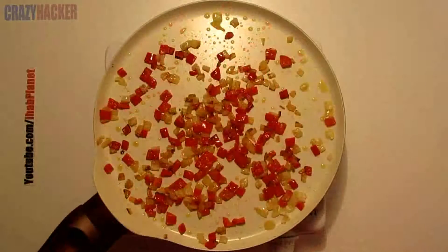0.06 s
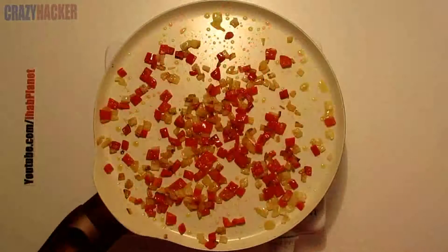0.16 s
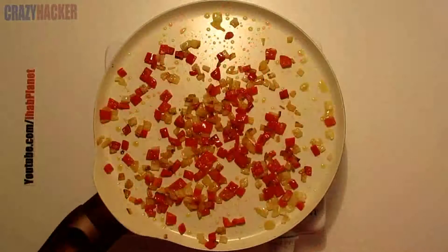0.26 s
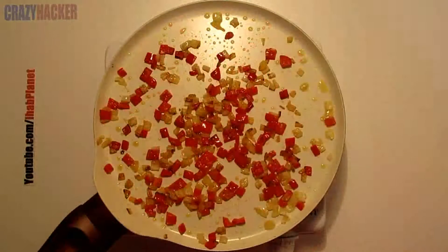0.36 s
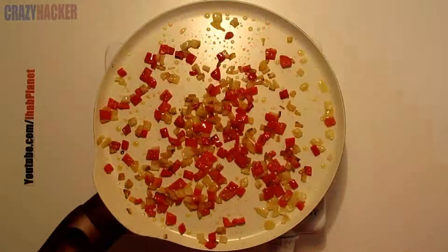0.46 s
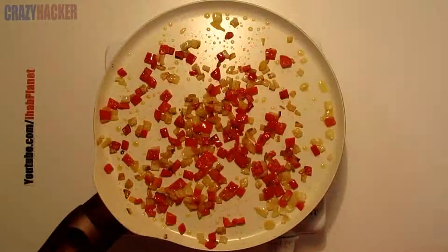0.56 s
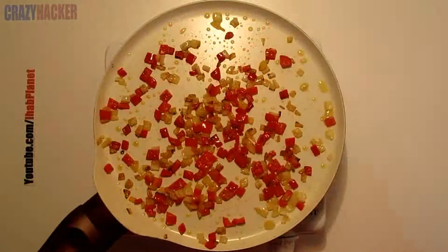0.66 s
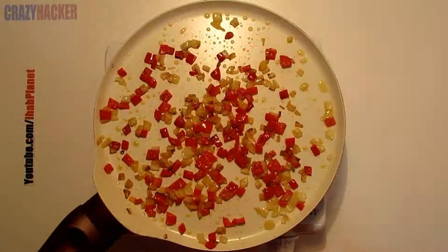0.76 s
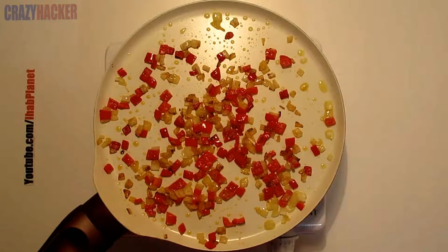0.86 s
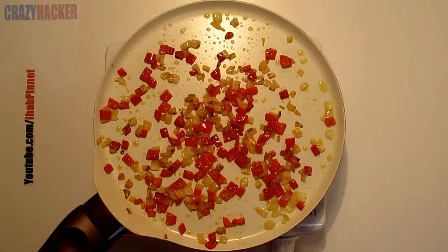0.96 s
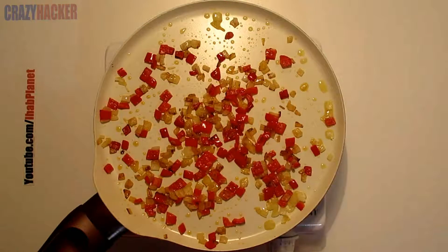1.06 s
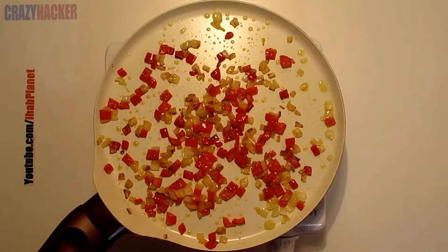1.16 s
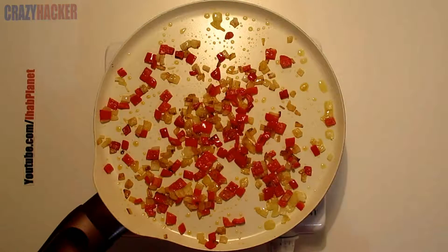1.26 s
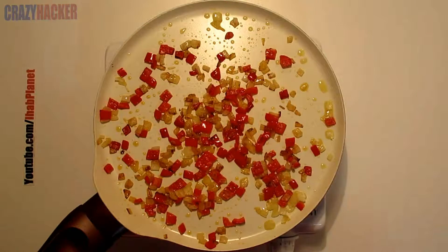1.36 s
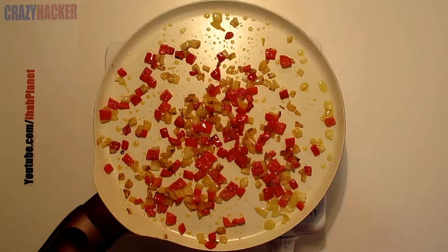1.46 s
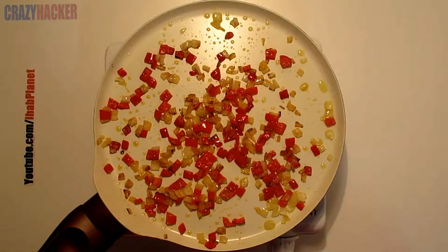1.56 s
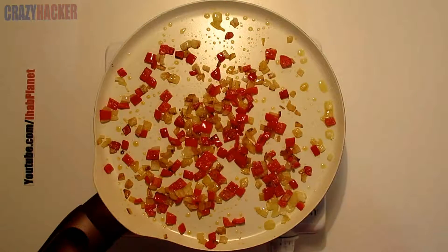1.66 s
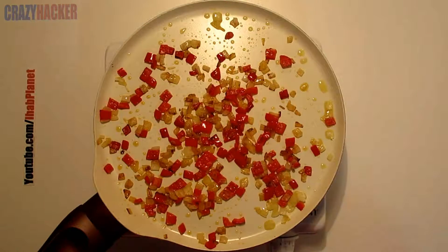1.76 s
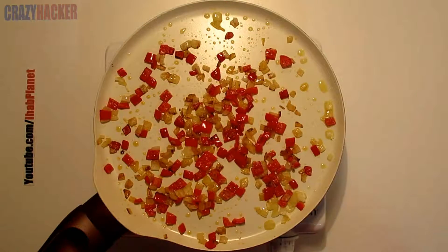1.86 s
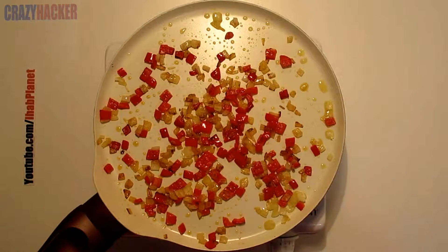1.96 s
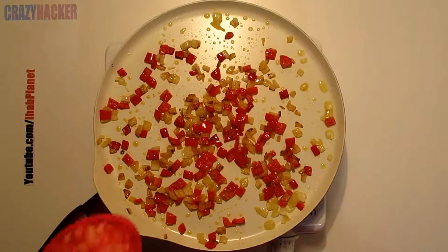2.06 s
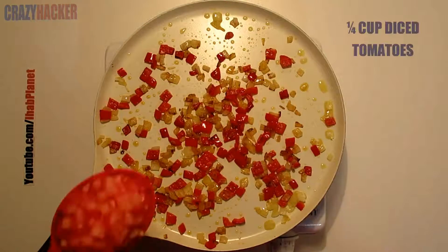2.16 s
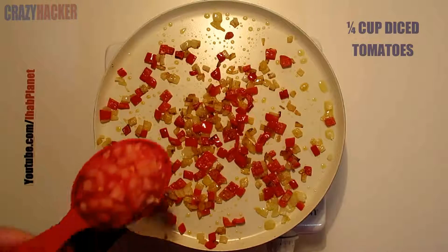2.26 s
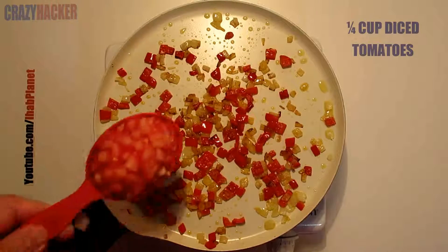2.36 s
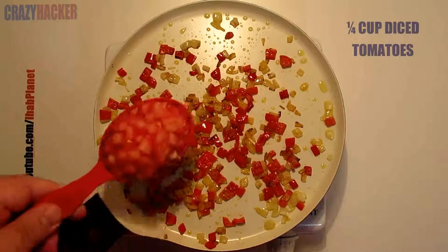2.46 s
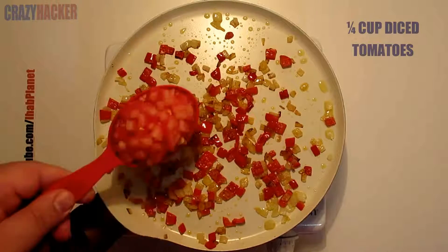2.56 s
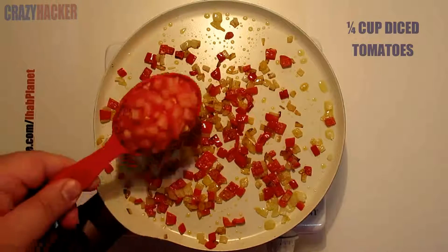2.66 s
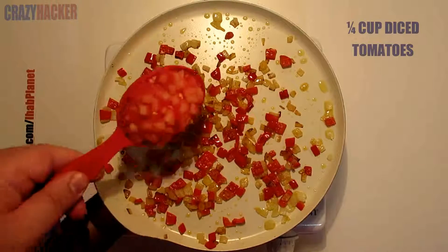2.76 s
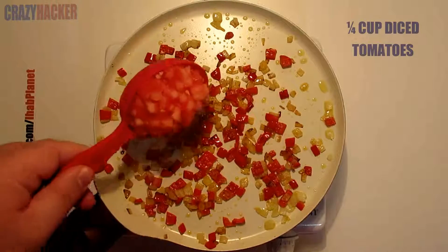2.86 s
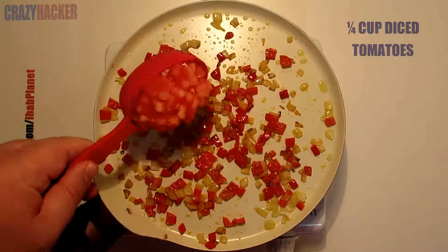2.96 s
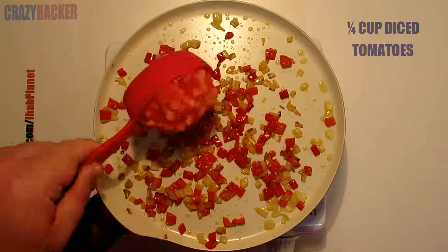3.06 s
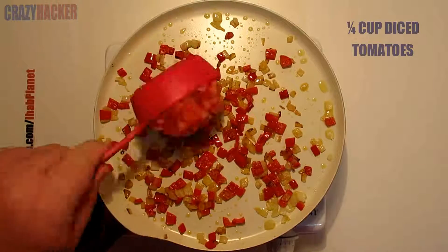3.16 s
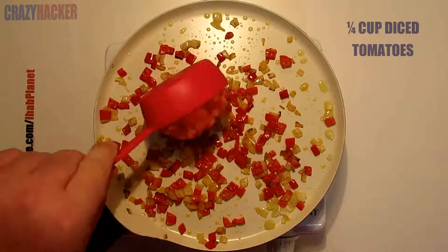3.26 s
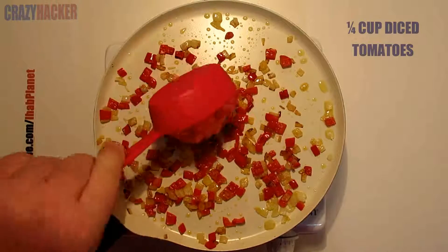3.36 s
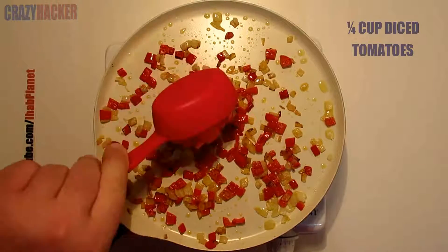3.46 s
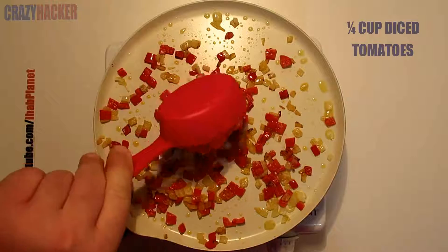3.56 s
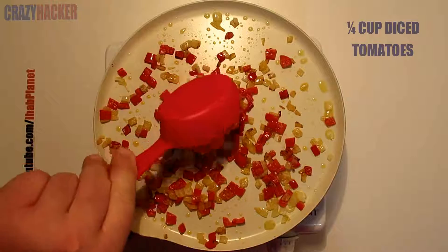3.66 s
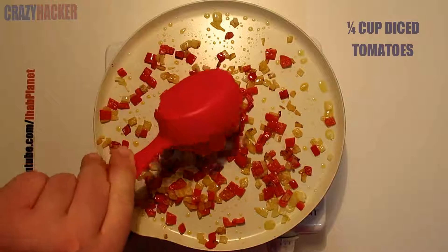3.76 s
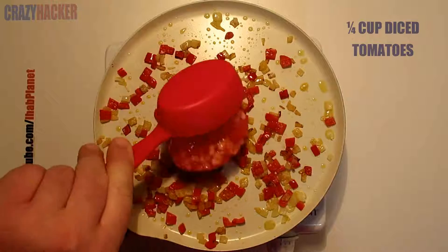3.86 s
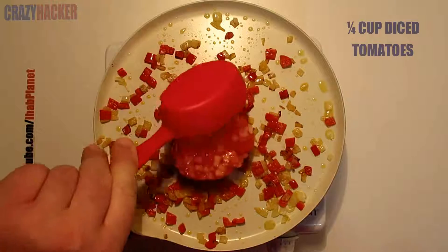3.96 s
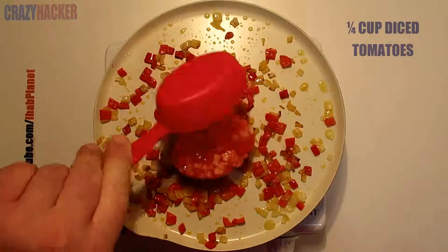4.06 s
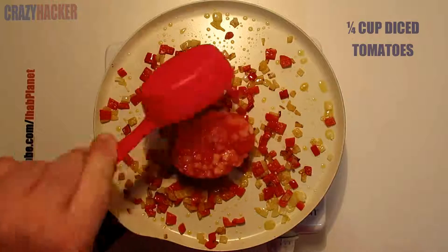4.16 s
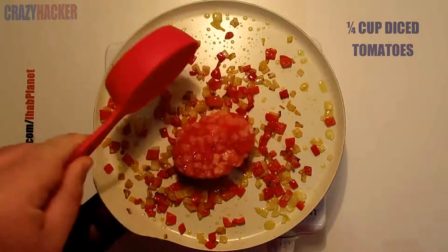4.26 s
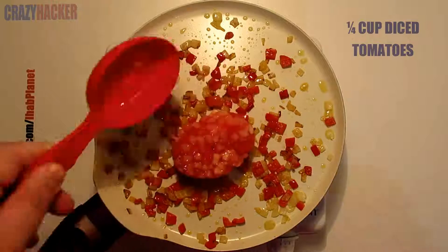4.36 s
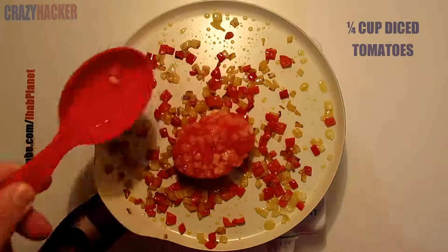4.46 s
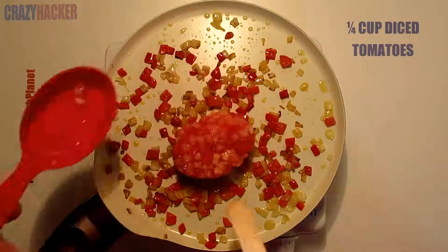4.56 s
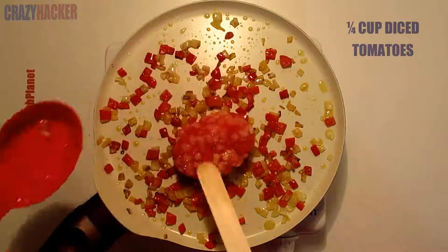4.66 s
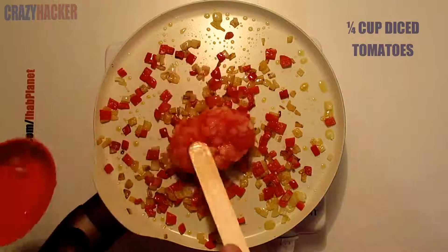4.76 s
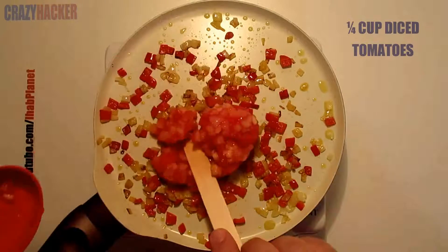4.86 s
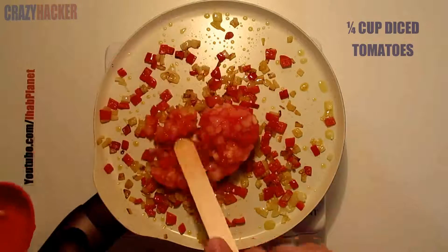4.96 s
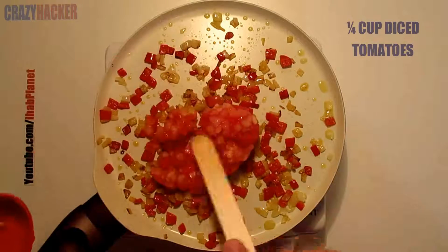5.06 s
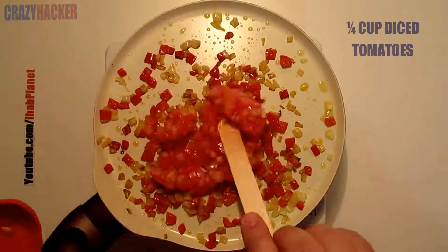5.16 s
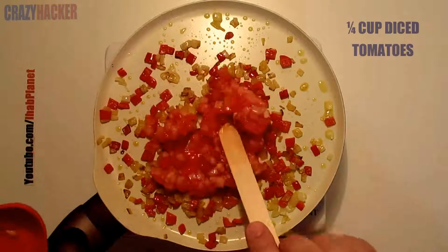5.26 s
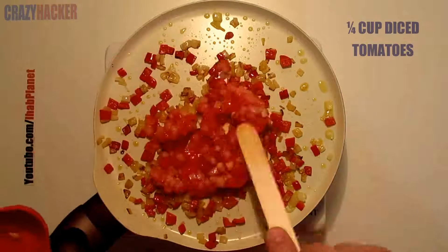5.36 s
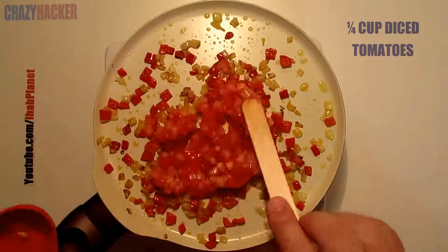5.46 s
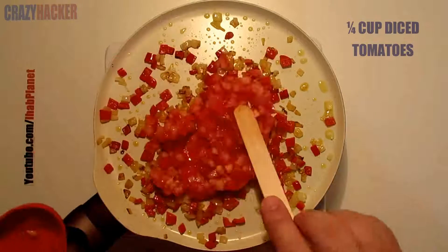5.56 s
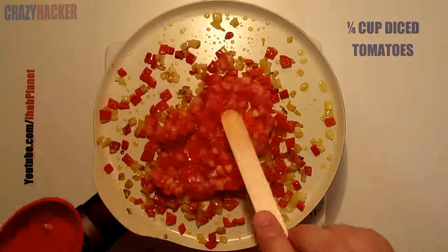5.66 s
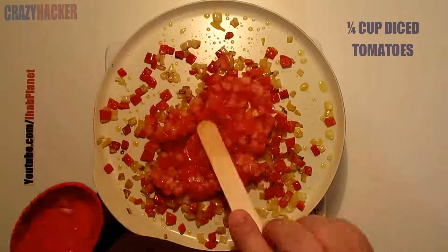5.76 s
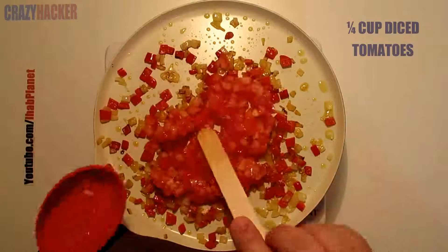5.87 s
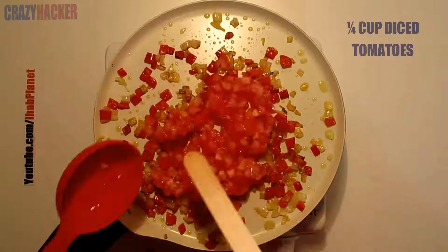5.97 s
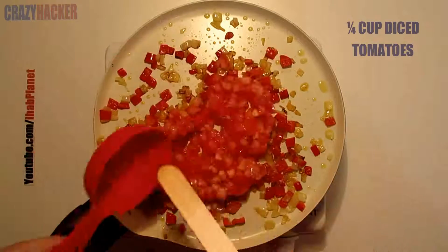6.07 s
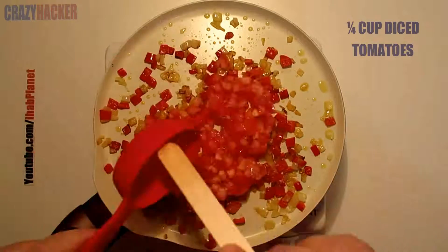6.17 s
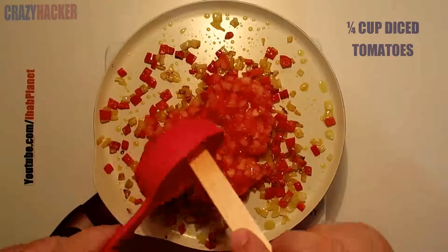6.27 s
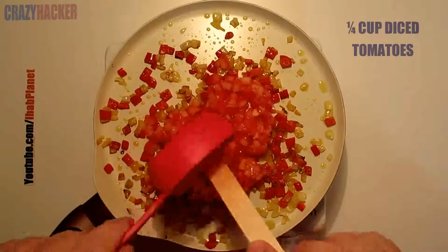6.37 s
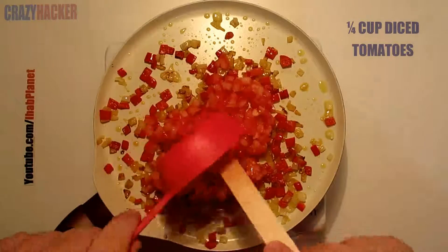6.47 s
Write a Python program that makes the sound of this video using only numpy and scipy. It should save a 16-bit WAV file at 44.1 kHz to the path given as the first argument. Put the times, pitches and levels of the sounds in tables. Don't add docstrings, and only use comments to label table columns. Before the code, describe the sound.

A nearly dry pan fizzes faintly with stray spits and soft knocks, then wet tomato lands and swells into a dense crackling sizzle.

```python
import sys
import numpy as np
from scipy import signal
from scipy.fft import rfft, irfft
from scipy.io import wavfile

SR = 44100
rng = np.random.default_rng(int(sys.argv[2]) if len(sys.argv) > 2 else 0)


def boost_factor(decibels):
    exponent = np.asarray(decibels, float) / 20
    return 10 ** exponent


def file_out(sig):
    cols = np.atleast_2d(sig).T
    lim = np.clip(cols, -1, 1)
    pcm = np.round(lim * 32767).astype(np.int16)
    wavfile.write(sys.argv[1], SR, pcm)


N = 287526

# time_s, level_db
FRYING_VIGOUR = [(4.15, -76), (4.24, -66), (4.31, -57.5), (4.42, -58), (4.5, -62.5), (4.76, -58.5),
                 (4.9, -60.5), (4.97, -56.5), (5.03, -57), (5.12, -53), (5.36, -51.5), (5.52, -49),
                 (5.7, -48.5), (6.05, -48.5), (6.25, -48), (6.52, -48)]
FULL_BOIL_DB = -48
# full_boil_db, steepness (dB per dB of vigour)
BUBBLE_SIZES = [
    (-47.5, 0.87),
    (-49.5, 1.72),
    (-50, 1.86),
]
# freq_hz, level_db
SIZZLE_COLOUR = [(400, -17), (800, -7), (1350, -9.5), (1600, -14), (1850, -4.5), (2400, -0.5), (3300, -1),
                 (3600, -2.5), (5500, 4.5), (9000, 2.5), (13000, 2.5), (15500, -4)]
# freq_hz, width_hz, level_db
PAN_MODES = [(1385, 82, 0), (1850, 57, 2), (2000, 30, -14), (2120, 70, -2), (2260, 47, -9), (2450, 31, -13),
             (2860, 110, -26), (3210, 65, 2), (4170, 41, 0), (4800, 82, -7), (5500, 68, -29)]
# delay_s, level_db
ECHOES = [
    (.0021, -54),
    (.0032, -21),
    (.0095, -15.5),
]
COUNTER_ECHO_S, COUNTER_ECHO_DB = .00105, -4
BUBBLE_DAMPING = 1.3
# time_s, peak_db, pitch_hz
SPITS = [(0.4194, -51, 7500), (0.8023, -46, 5500), (0.9232, -47, 7800), (1.1549, -45, 9000),
         (1.1901, -42, 11000), (1.3573, -48, 8000), (2.1741, -44, 9000), (2.7617, -45, 5900),
         (2.8711, -43, 6300), (3.2709, -53, 7800), (3.5512, -45, 11000), (3.6846, -42, 5500),
         (3.7947, -43, 7000), (3.8033, -46, 10500), (3.8916, -42, 5500), (4.0417, -39, 5200)]
# time_s, peak_db, pitch_hz
HEAP_POPS = [(4.2715, -46, 2800), (4.3043, -45, 2100), (4.3585, -41, 2300), (4.3683, -41, 3900),
             (4.3844, -44, 2400), (4.41, -39, 6300), (4.4146, -41, 5200), (4.4254, -40, 2400),
             (4.4536, -38, 2100), (4.5959, -42, 2400), (4.6111, -38, 8400), (4.6825, -44, 3000),
             (4.6983, -43, 2600), (4.7792, -25, 6300), (4.7832, -41, 3900), (4.7931, -40, 3200),
             (4.8512, -41, 3000), (4.8607, -42, 2800), (4.8871, -42, 5200), (4.8971, -40, 2600),
             (4.9454, -39, 2600), (4.9603, -38, 2800), (4.972, -36, 5900), (4.9903, -39, 2800),
             (5.0106, -36, 5200)]
# time_s, peak_db, pitch_hz
LOUD_POPS = [(5.0429, -30, 6300), (5.05, -21, 5500), (5.0542, -34, 4200), (5.0895, -31, 5500),
             (5.1158, -29, 5200), (5.1247, -32, 6300), (5.1588, -26, 2800), (5.165, -26, 6800),
             (5.191, -33, 5500), (5.2168, -32, 6800), (5.2224, -29, 2600), (5.2545, -34, 3900),
             (5.2619, -24, 5500), (5.3121, -27, 5200), (5.3152, -30, 2300), (5.3283, -31, 7800),
             (5.3659, -28, 4200), (5.3928, -34, 2800), (5.4546, -32, 3000), (5.4932, -28, 4500),
             (5.5037, -24, 6300), (5.5552, -29, 7800), (5.5624, -27, 6800), (5.5759, -28, 2800),
             (5.5958, -31, 2600), (5.6098, -30, 9600), (5.6336, -29, 10300), (5.6459, -29, 2400),
             (5.7091, -23, 6300), (5.7258, -30, 5900), (5.745, -25, 2600), (5.7682, -28, 6300),
             (5.8119, -23, 9000), (5.8242, -26, 4800), (5.8495, -29, 6800), (5.8746, -23, 10300),
             (5.8947, -24, 6300), (5.9104, -29, 7800), (5.942, -25, 6800), (5.9691, -26, 10300),
             (6.0434, -26, 2600), (6.0669, -24, 2800), (6.1258, -27, 8400), (6.1342, -29, 2800),
             (6.1589, -28, 2400), (6.2186, -29, 5200), (6.2407, -26, 5500), (6.2669, -28, 7300),
             (6.2751, -28, 5200), (6.3003, -28, 9600), (6.3156, -27, 5900), (6.3229, -24, 6300),
             (6.347, -24, 2800), (6.3547, -27, 5500), (6.3954, -25, 4500), (6.4145, -22, 6300),
             (6.4557, -28, 10300), (6.4831, -28, 5200)]
# time_s, level_db
SIMMER_FIZZ = [
    (0.0, -63),
    (1.68, -62),
    (2.29, -62),
    (4.14, -59),
    (4.3, -63),
]
# start_s, peak_db, hardness_db (treble, relative), contact_s
KNOCKS = [(0.06, -54.5, -6, 0.021), (0.623, -42, 2, 0.041), (0.684, -57, 3, 0.025), (1.053, -59, 1, 0.03),
          (1.44, -55.5, -12, 0.036), (2.479, -50, -12, 0.021), (2.706, -40, 0.5, 0.026),
          (2.744, -48, -13, 0.015), (3.571, -51.5, -13, 0.029), (4.056, -35.5, -3.5, 0.022),
          (4.084, -47.5, -5, 0.037), (4.127, -44, -6.5, 0.046), (4.178, -53, -0.5, 0.013),
          (4.24, -45, -3.5, 0.037), (4.367, -44, -9, 0.026), (4.593, -41, -7, 0.028),
          (4.94, -50.5, 1.5, 0.018), (4.976, -40.5, -2.5, 0.021), (5.034, -45.5, -1.5, 0.055),
          (5.409, -39, -0.5, 0.021), (5.739, -38.5, 0, 0.022), (6.066, -60.5, 21, 0.011),
          (6.414, -48, 12, 0.015)]
# freq_hz, level_db, t60_s
HOB_MODES = [(515, -13, 0.14), (575, -7.5, .05), (595.4, 1.5, 0.12), (627, 0, 0.12), (785, -3.5, 0.045),
             (955, -4.5, 0.09), (1020, -5, 0.11), (1140, -10.5, 0.072)]
# freq_hz, level_db (per Hz)
CLACK_COLOUR = [(900, -11), (1700, -8.5), (2300, 1.5), (2600, -2.5), (3100, -9), (3800, -8.5), (4400, -5),
                (4900, -5), (5700, -14), (9200, -10.5), (10000, -17.5), (14000, -63)]
# level_db, pitch_hz, t60_s
THUMP = (-59, 52, 0.38)
THUMP_S = 4.05
# start_s, hold_s, level_db
BRUSHES = [
    (1.05, 0.032, -60.5),
    (1.12, 0.071, -71),
    (1.19, 0.0089, -67.5),
]
# freq_hz, level_db (per Hz)
BRUSH_COLOUR = [(400, -14), (620, 0.5), (1000, -7), (1450, -1), (2300, 2), (3200, -4), (5000, -6),
                (9000, -18), (14000, -29)]
# start_s, hold_s, level_db
WHISTLES = [
    (.72, 0.68, -74),
]
# freq_hz, width_hz, level_db
WHISTLE_BANDS = [
    (1456, 69, -4),
    (1624, 64, -6),
    (1710, 79, -2),
]
# freq_hz, level_db (per Hz)
AIR_COLOUR = [(20, -16), (55, -6), (106, -5.5), (140, -4.5), (170, -7.5), (360, -7.5), (700, -11),
              (1300, -11.5), (3000, -13), (3800, -18), (7500, -13.5), (9200, -19), (12700, -19.5),
              (14700, -26.5)]
AIR_DB = -63
# freq_hz, width_hz, level_db
DRONES = [
    (54.3, 17, -81),
    (141.4, 9.2, -75),
    (940, 29, -80.5),
]


def sizzle():
    vigour_db = in_time(FRYING_VIGOUR, silent_db=-120)[0] - FULL_BOIL_DB
    levels = [db + steepness * vigour_db for db, steepness in BUBBLE_SIZES]
    bursts = grains(6000, spread_db=3.4)
    dealt = rng.integers(0, 12, N)
    out = 0
    for k, hz in enumerate(np.geomspace(1300, 13000, 12)):
        size = np.interp(np.log(hz), np.log([2600, 5700, 11000]), [0, 1, 2])
        level_db = sum(max(1 - abs(size - j), 0) * level for j, level in enumerate(levels))
        one = rms_one(bubble(bursts * (dealt == k), hz))
        delay = int(COUNTER_ECHO_S * SR * rng.uniform(0.864, 2.5))
        one = one + boost_factor(COUNTER_ECHO_DB - 11) * np.roll(one, delay)
        flicker_db = 1.2 * drift(14)
        out = out + boost_factor(level_db + flicker_db - 7) * one
    return colour(in_pan(out, ring_db=1, tail_db=-30, tail_t60=.08), SIZZLE_COLOUR)


def pops():
    bursts = lesser_pops() + SPITS + HEAP_POPS + LOUD_POPS
    out = np.zeros(N + 256)
    spots = rng.standard_normal((len(bursts), 3))
    for (s, db, hz), spot in zip(bursts, spots):
        click = np.zeros(256)
        click[0] = 1
        click[int(COUNTER_ECHO_S * SR + 1.5 * spot[0])] = boost_factor(COUNTER_ECHO_DB + 1.5 * spot[1])
        edge_db = -12.5 + 4 * spot[2]
        crack = boost_factor(edge_db) * np.convolve(click, [.5, -1, .5])[:256]
        i = int(s * SR)
        out[i:i + 256] += boost_factor(db + 4.5) * (bubble(click, hz) + crack)
    return in_pan(band(out[:N], 800, 19500), ring_db=-3, tail_db=-27, tail_t60=.05)


def lesser_pops():
    per_s, over_boil_db, spread_db = 34, 15, 2.5
    low_hz, high_hz = 2800, 10000
    s, db = np.transpose(FRYING_VIGOUR)
    draw = rng.random((int(per_s * (s[-1] - s[0])), 3))
    when = s[0] + (np.arange(len(draw)) + draw[:, 0]) / per_s
    level_db = np.interp(when, s, db) + over_boil_db + spread_db * (2 * draw[:, 1] - 1)
    pitch_hz = low_hz * (high_hz / low_hz) ** draw[:, 2]
    return list(zip(when, level_db, pitch_hz))


def bubble(clicks, hz):
    r, w = np.exp(-BUBBLE_DAMPING * hz / SR), 2 * np.pi * hz / SR
    return signal.lfilter([0, 1], [1, -2 * r * np.cos(w), r * r], clicks + 1e-18) * np.sin(w)


def in_pan(x, ring_db, tail_db, tail_t60):
    t = np.arange(int(.25 * SR)) / SR
    diffuse = band(rng.standard_normal(len(t)), 460, 25000)
    reply = boost_factor(tail_db - 60 * t / tail_t60) * diffuse * (t > .0012)
    reply[0] = 1
    for s, db in ECHOES:
        reply[int(s * SR)] += boost_factor(db)
    rings = sum(boost_factor(db + ring_db) * resonate(x, hz, width) for hz, width, db in PAN_MODES)
    return signal.fftconvolve(x + rings, reply)[:N]


def simmer():
    fizz = rms_one(band(grains(3000, spread_db=1.5), 3100, 13900))
    return boost_factor(in_time(SIMMER_FIZZ)[0] - 6) * fizz


def knocks():
    out, edge = np.zeros(N), np.zeros(N)
    t = np.arange(int(.2 * SR)) / SR
    for s, db, hard_db, contact in KNOCKS:
        draw = rng.standard_normal((3, len(t)))
        hold = max(contact, .002)
        rattle = draw[0] * np.exp(-(t / (0.44 * hold)) ** 2)
        rattle[0] += 8
        thud = 0
        for (hz, mode_db, t60), vary in zip(HOB_MODES, draw[1]):
            mode = boost_factor(-60 * t / t60) * np.sin(2 * np.pi * hz * t)
            ring = signal.fftconvolve(rattle, mode)[:len(t)]
            thud = thud + boost_factor(mode_db + 1.5 * vary) * ring / np.abs(ring).max()
        thud = boost_factor(db + 2) * thud / np.abs(thud).max()
        rise = 1 - np.exp(-t / .0015)
        fall = np.exp(-(t / (0.0082 + 0.31 * hold)) ** 1.18) + boost_factor(-16.5 - 60 * t / 0.11)
        clack = boost_factor(db + hard_db + 8.5) * draw[2] * rise * fall
        i = int(s * SR)
        out[i:i + len(t)] += thud[:N - i]
        edge[i:i + len(t)] += clack[:N - i]
    return band(band(out, 530, 5500), 320, 8600) + colour(edge, CLACK_COLOUR)


def thump():
    db, hz, t60 = THUMP
    t = np.maximum(np.arange(N) / SR - THUMP_S, 0)
    return boost_factor(db - 60 * t / t60) * np.sin(2 * np.pi * hz * t)


def brush():
    friction = grains(4000, spread_db=5) * rng.choice([-1, 1], N)
    gain = swell(BRUSHES, rise_db_per_s=400, fall_db_per_s=250)
    return gain * rms_one(colour(friction, BRUSH_COLOUR))


def whistle():
    bands = sum(boost_factor(db) * narrow_noise(hz, width) for hz, width, db in WHISTLE_BANDS)
    return swell(WHISTLES, rise_db_per_s=300, fall_db_per_s=27) * bands


def kitchen_air():
    air = boost_factor(AIR_DB) * rms_one(colour(rng.standard_normal(N), AIR_COLOUR))
    for hz, width, db in DRONES:
        air += boost_factor(db) * narrow_noise(hz, width)
    return air


def narrow_noise(hz, width_hz):
    return rms_one(resonate(resonate(rng.standard_normal(N), hz, width_hz), hz, width_hz))


def grains(per_s, spread_db):
    sizes = boost_factor(spread_db * np.minimum(rng.exponential(1, N), 3))
    clumps = boost_factor(1.2 * drift(25))
    return rms_one(sizes * (rng.random(N) < per_s * clumps / SR))


def drift(rate):
    r = np.exp(-80 * np.pi * rate / SR)
    noise = rng.standard_normal(N // 40 + 2002)
    slow = signal.lfilter([1], [1, -2 * r, r * r], noise)[2000:]
    return np.interp(np.arange(N) / 40, np.arange(len(slow)), rms_one(slow))


def swell(rows, rise_db_per_s, fall_db_per_s):
    t = np.arange(N) / SR
    gain = 0
    for s, hold, db in rows:
        rise_db = rise_db_per_s * np.maximum(s - t, 0)
        fall_db = fall_db_per_s * np.maximum(t - s - hold, 0)
        gain = gain + boost_factor(db - rise_db - fall_db)
    return gain


def in_time(rows, silent_db=None):
    s, *columns = np.transpose(rows)
    t = np.arange(N) / SR
    return [np.interp(t, s, c, left=silent_db, right=silent_db) for c in columns]


def colour(x, points, size=8192):
    hz, db = np.transpose(points)
    grid = np.arange(1, size // 2 + 2) * SR / size
    cepstrum = irfft(np.interp(np.log(grid), np.log(hz), db) * np.log(10) / 20)
    cepstrum[1:size // 2] *= 2
    cepstrum[size // 2 + 1:] = 0
    return signal.fftconvolve(x, irfft(np.exp(rfft(cepstrum))))[:len(x)]


def resonate(x, hz, width_hz):
    r = np.exp(-np.pi * width_hz / SR)
    zeros = (1 - r * r) / 2 * np.array([1, 0, -1])
    poles = [1, -2 * r * np.cos(2 * np.pi * hz / SR), r * r]
    return signal.lfilter(zeros, poles, x + 1e-18)


def band(x, low_hz, high_hz):
    edges = [low_hz, min(high_hz, SR * .45)]
    return signal.sosfilt(signal.butter(2, edges, "band", fs=SR, output="sos"), x + 1e-18)


def rms_one(x):
    return x / np.sqrt(np.mean(x ** 2) + 1e-20)


def scene():
    near = knocks() + sizzle() + simmer() + pops()
    behind = thump() + brush() + whistle() + kitchen_air()
    return (near + behind)[None]


def roll_off(x):
    return signal.sosfilt(signal.butter(12, 15810, fs=SR, output="sos"), x)


def record(dry):
    low_pass = signal.cheby2(20, 45, 15150 * 1.012, fs=SR, output="sos")
    mix = signal.sosfilt(low_pass, dry)
    return roll_off(mix)


dry = scene()
out = record(dry)
file_out(out)
```